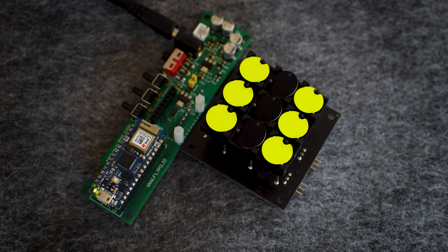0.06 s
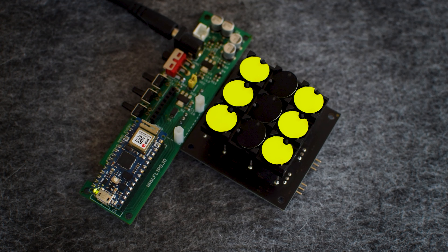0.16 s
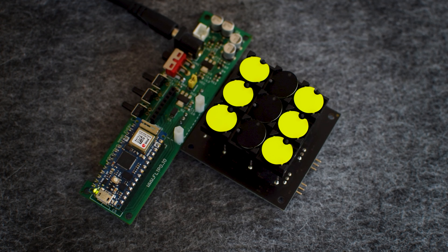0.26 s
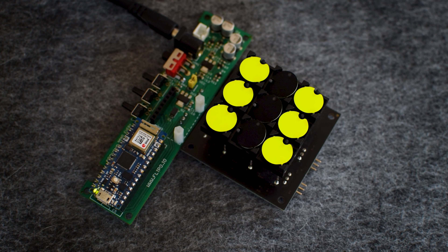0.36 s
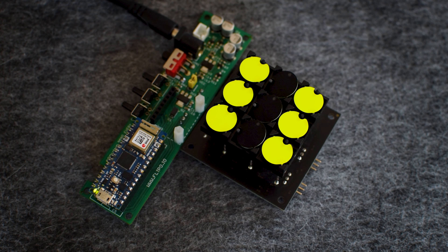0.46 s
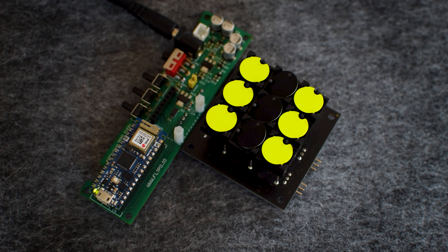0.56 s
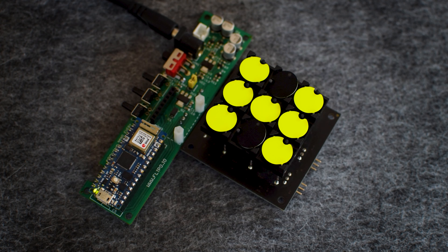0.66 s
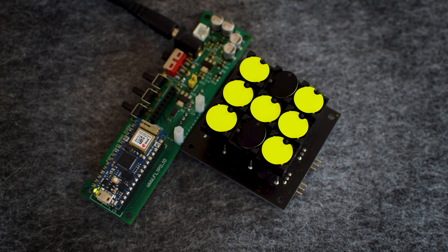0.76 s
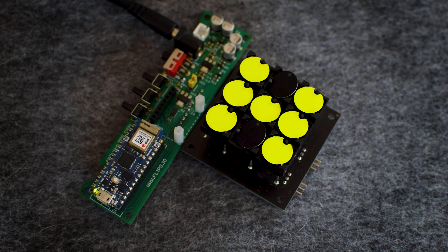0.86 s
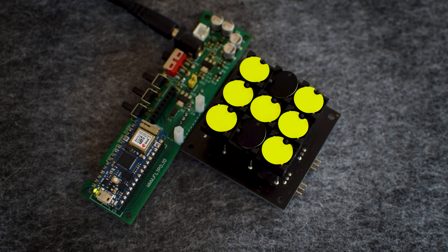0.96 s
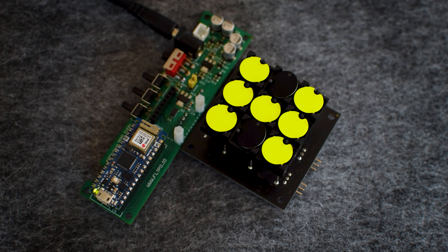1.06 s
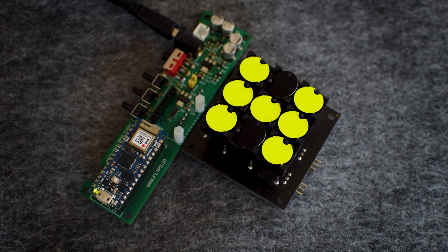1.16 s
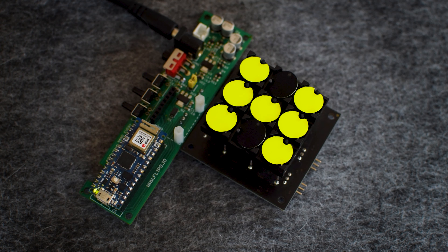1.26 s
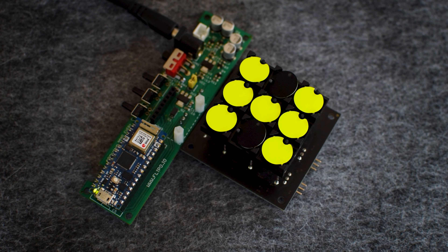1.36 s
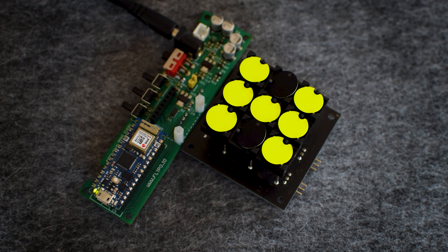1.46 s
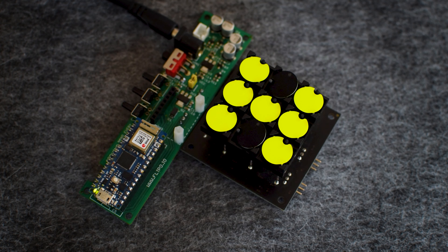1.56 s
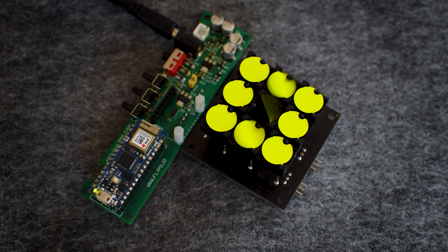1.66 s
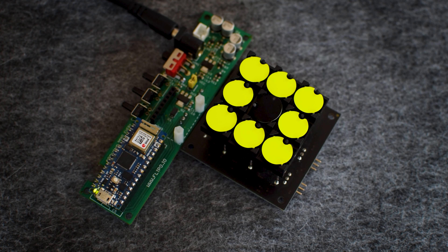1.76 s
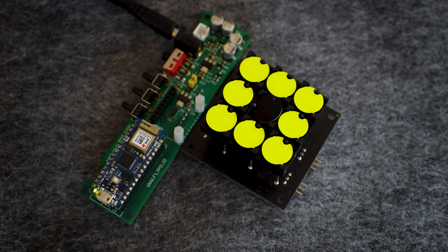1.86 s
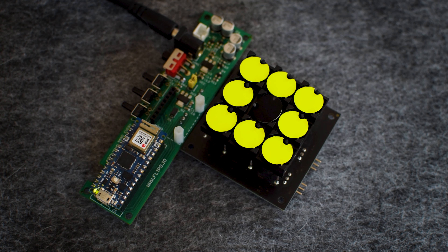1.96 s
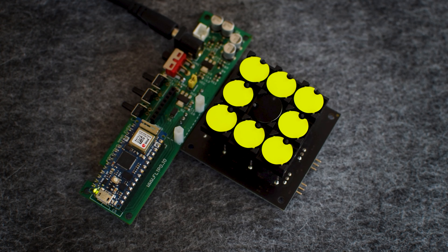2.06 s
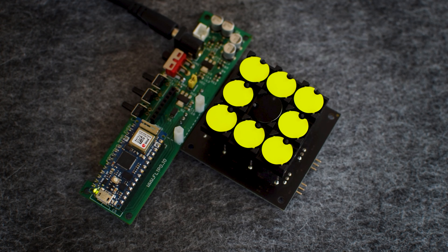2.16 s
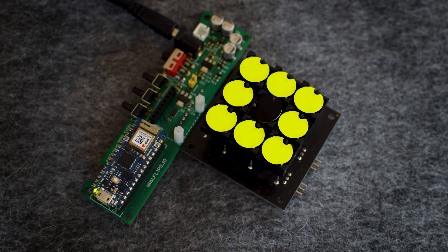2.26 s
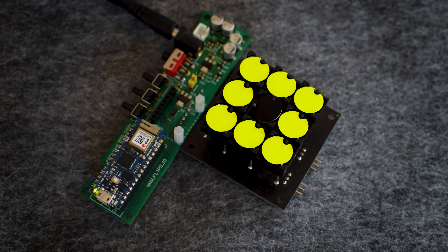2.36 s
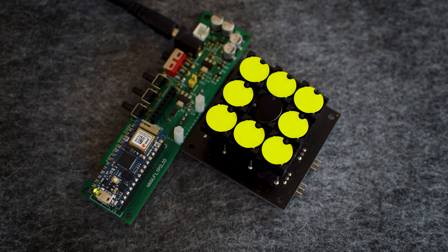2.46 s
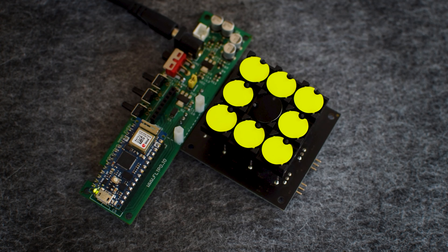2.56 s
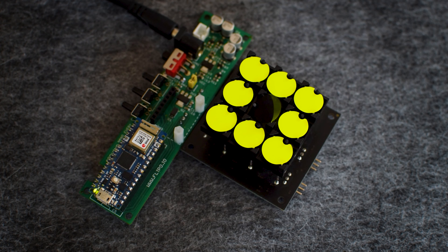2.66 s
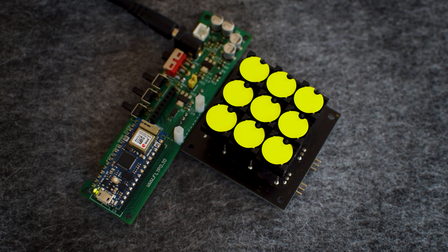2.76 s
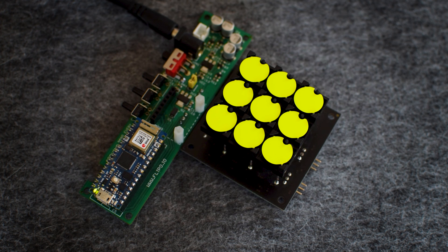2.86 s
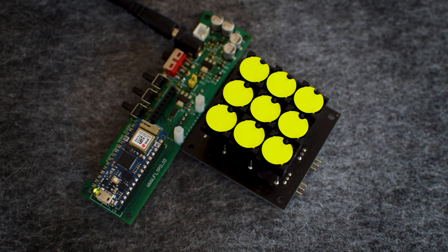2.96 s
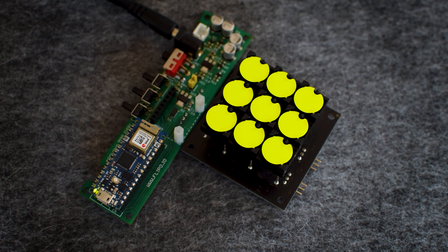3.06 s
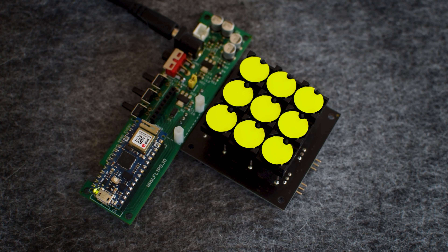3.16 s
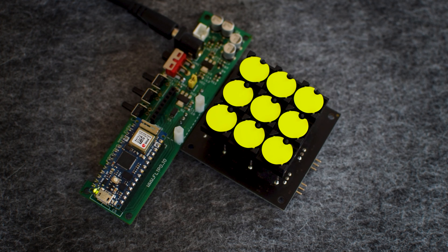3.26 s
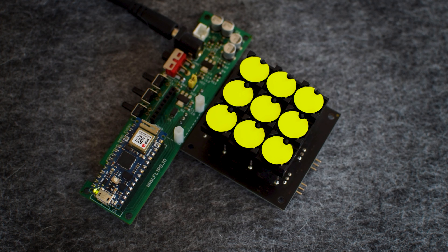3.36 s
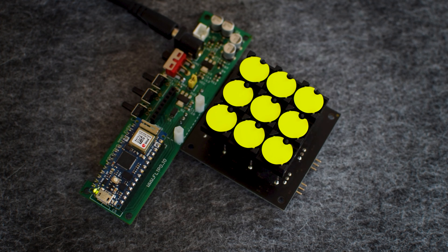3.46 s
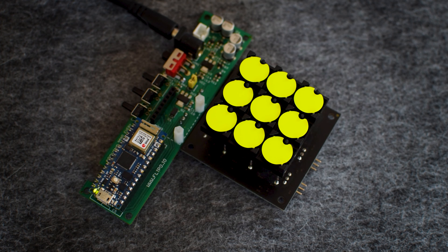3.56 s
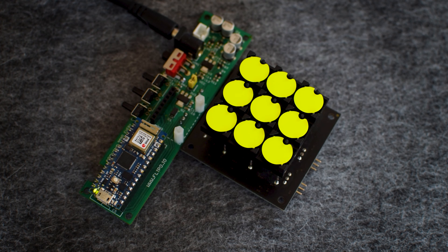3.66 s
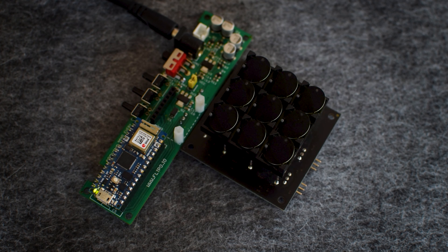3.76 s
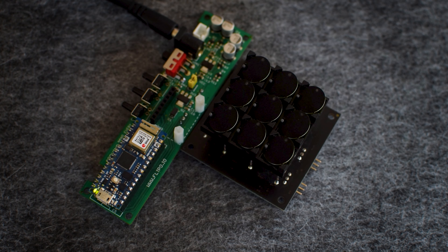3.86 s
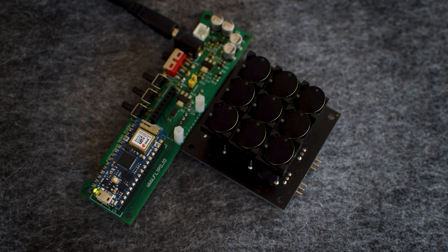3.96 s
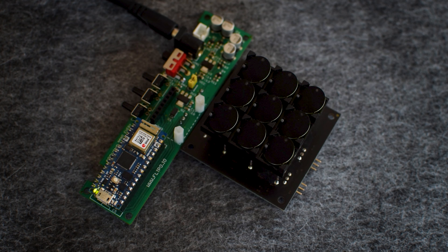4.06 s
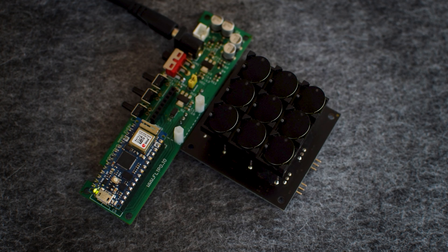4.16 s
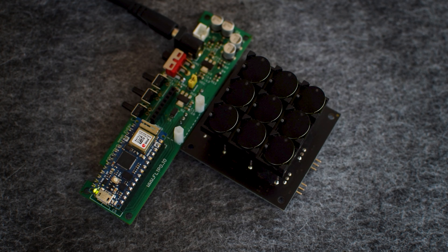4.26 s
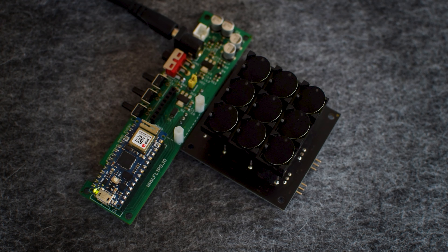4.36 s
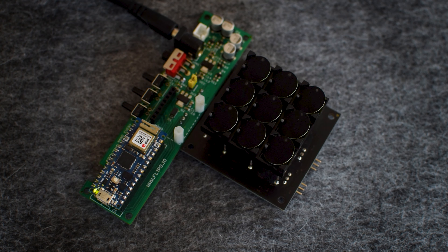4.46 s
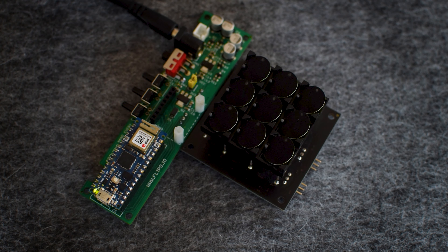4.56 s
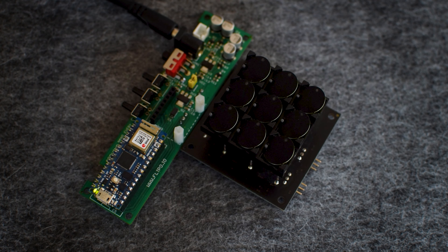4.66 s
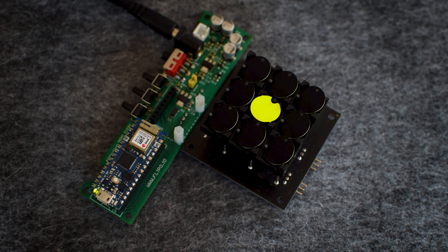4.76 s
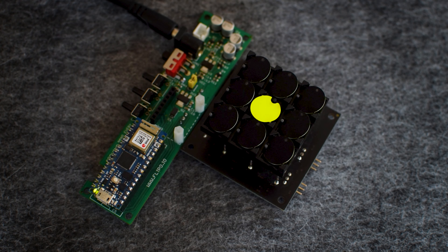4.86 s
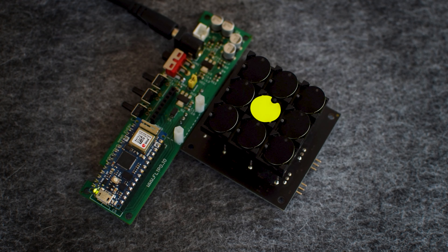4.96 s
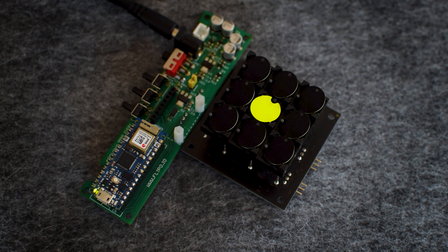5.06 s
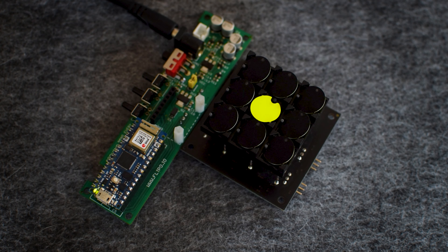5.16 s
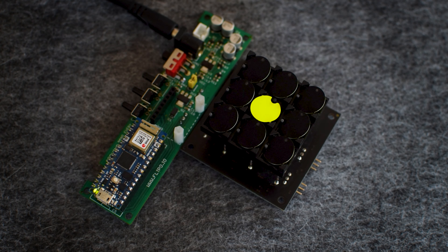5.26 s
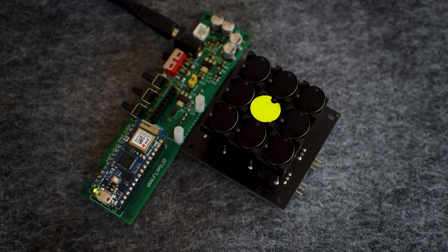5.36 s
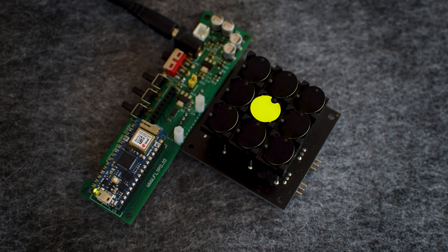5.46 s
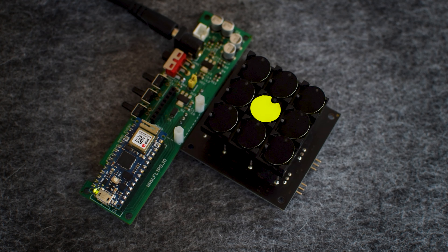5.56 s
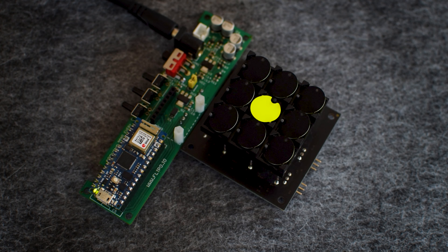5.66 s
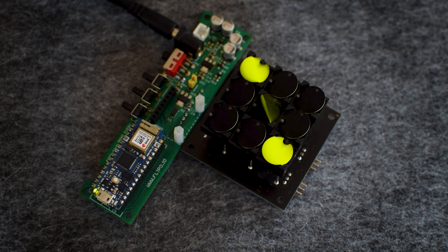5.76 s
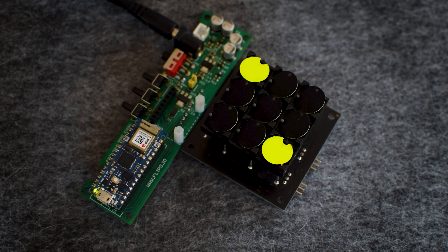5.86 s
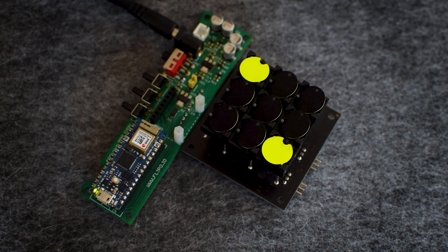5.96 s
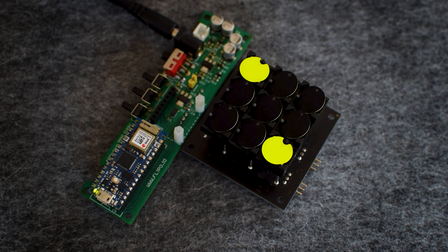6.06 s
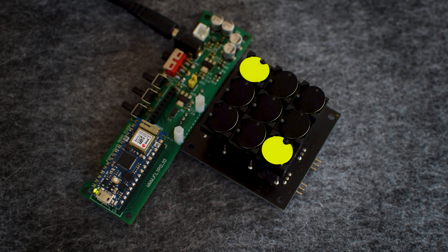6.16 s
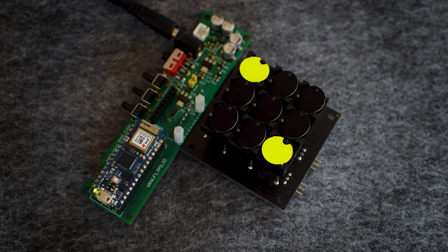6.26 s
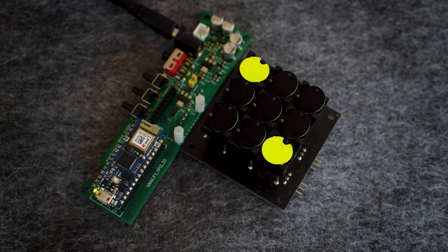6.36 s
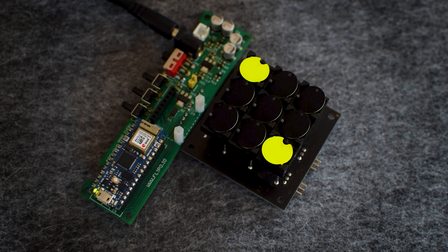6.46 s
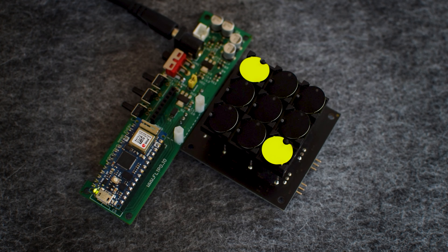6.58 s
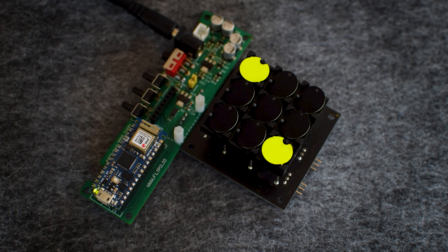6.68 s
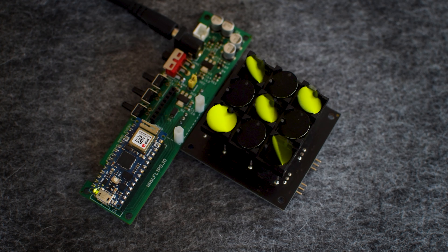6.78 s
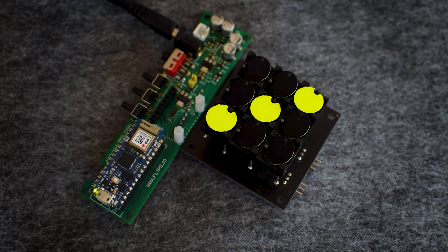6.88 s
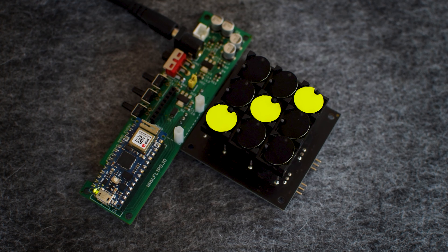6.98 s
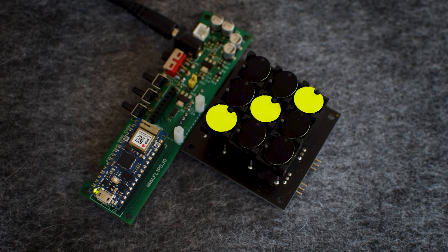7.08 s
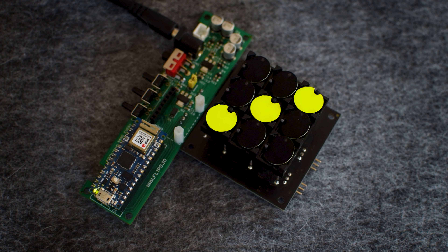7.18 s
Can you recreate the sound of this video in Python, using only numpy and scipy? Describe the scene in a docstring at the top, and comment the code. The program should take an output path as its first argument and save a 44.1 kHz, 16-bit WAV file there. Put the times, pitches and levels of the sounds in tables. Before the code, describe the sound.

A small flip-disc display clicks seven times in a quiet room, close to the microphone and slightly to the left. Each change begins with a tiny ringing rattle as the discs are kicked loose, followed a split second later by a sharp, bright snap and a slight bounce, dying away quickly. A single disc clicks at about 0.7 seconds, a few clack together at 1.7, and one clicks at 2.7. The fullest clatter comes at 3.7 seconds, when all the discs land almost at once. Another single click follows at 4.8, then thicker clacks at 5.8 and 6.8 seconds. The fuller changes make the circuit board ring briefly and pass a very faint thud into the table. The room adds only a slight, short reverberation, and a very faint low rumble and hiss continue between the clicks.

```python
"""A quiet room, where a three-by-three flip-disc display changes its pattern about once a second.
A coil pulse kicks each disc loose with a ringing rattle; some 50 ms later the disc snaps against
its stop and bounces. These impacts excite damped vibrations in the frame, the circuit board and
the table beneath. A close stereo microphone also hears faint reverberation, rumble, hiss and hum."""
import sys
import numpy as np
from scipy import signal
from scipy.fft import rfft, irfft, next_fast_len
from scipy.io import wavfile
from scipy.ndimage import map_coordinates

SR = 44100
rng = np.random.default_rng(int(sys.argv[2]) if len(sys.argv) > 2 else 0)


def transcribe(signal):
    """Save signal, clipped to [-1, 1], as a 16-bit WAV file at the path in sys.argv[1]."""
    frames = np.atleast_2d(signal).T
    limited = np.clip(frames, -1, 1)
    pcm = np.round(limited * 32767).astype(np.int16)
    wavfile.write(sys.argv[1], SR, pcm)


N = 318402
AGE = np.arange(SR // 4) / SR  # time since a contact, s
KICK_STEP_S, LAND_STEP_S, SCATTER_S = .0013, .0015, .0004  # disc-to-disc spacing and its spread

# Pattern changes, with relative levels per disc: start_s, disc_count, chatter_db, ring_db,
# flight_s, last_disc_lag_s, rebound_s, snap_db, board_db
FLIPS = [(0.6313, 1, -12, -12.5, 0.054, 0, 0.021, -1.5, -4.5),
         (1.6534, 3, -2, -2, 0.054, 0.002, .0213, -1.5, 1.5),
         (2.6779, 1, -2.5, -4, 0.055, 0, 0.023, -1.5, -7.5),
         (3.6995, 9, 1, -6, 0.056, 0.00081, 0.022, -2, 3.5),
         (4.7317, 1, -5.5, 0.5, .0507, 0, .0229, -1.5, -4),
         (5.7533, 3, -3, -6, 0.052, 0.0063, 0.023, -1.5, .5),
         (6.7790, 5, -3, -3.5, 0.052, 0.003, 0.017, -2, 2)]
def arrivals():
    """Time of flight sets when each disc meets its stop: rows of time_s, rebound_s, snap_db, board_db."""
    blows = []
    for start, discs, _, _, flight, lag, rebound, snap_db, board_db in FLIPS:
        times = in_turn(start + flight, discs, LAND_STEP_S)
        times[-1] += lag
        blows += [(s, rebound, snap_db, board_db) for s in times]
    return blows


def contacts(blows):
    """Inelastic collision: each disc strikes, springs off and falls back once with less energy."""
    for s, rebound, snap_db, board_db in blows:
        yield s, snap_db, board_db
        yield s + rebound, snap_db - 16.5, board_db - 11.5


# Spectrum of a disc striking its stop: frequency_hz, level_db
SNAP_SPECTRUM = [(200, -40.5), (900, -34), (2200, -27), (3100, -7), (3900, -12.5), (4500, -8.5),
                 (6300, 0.5), (9400, 0), (11100, -2.5), (12000, -10.5), (15500, -13.5), (17000, -23)]
# Spectrum of the ringing frame: frequency_hz, level_db
FRAME_SPECTRUM = [(100, -25), (700, -29.5), (1400, -12), (2000, -25), (3300, 1), (4600, -5), (6000, 0.5),
                  (8200, 2.5), (10500, -6), (13000, -5), (15500, -9.5), (16500, -22.5)]
# Modes of the circuit board: pitch_hz, level_db, t60_s
BOARD_MODES = [(251, -19, 0.09), (795, -22, .13), (1400, -.5, .05), (1493, .5, .055), (1675, -4, .045),
               (1870, -6, 0.028), (2036, -3.5, 0.03), (1110, -11, .055), (1180, -9, .06), (3220, 2, .035),
               (3450, 4, .032), (5856, 2, .035), (2330, -4, 0.054), (2600, -4, 0.029), (2920, -1.5, .04),
               (3620, 2.5, .045), (3930, -1, 0.045), (5100, -3, .04), (7960, 5, 0.042), (8320, 5.5, .025),
               (11260, 2, 0.026)]
def landings(blows):
    """Impact excitation: a broadband snap sets disc, frame and board into free, damped vibration."""
    out, snap = np.zeros((2, N)), impulse(SNAP_SPECTRUM)
    for s, db, board_db in contacts(blows):
        add(out, s, amp(db - 3.5) * snap)
        add(out, s + .0032, amp(db - 19) * snap)  # reflection from a nearby surface
        shiver = amp(-15.5) * body_noise(SNAP_SPECTRUM) * fade(.0081)
        frame = amp(-26.5) * body_noise(FRAME_SPECTRUM) * fade(.044)
        add(out, s, amp(db) * (shiver + frame) * rise(.00033))
        board = amp(-44) * ring(BOARD_MODES, detune=.007, scatter_db=1.5) * rise(.0008)
        add(out, s, amp(board_db) * (board + amp(-32.5) * flex(t60=.042)))
    return out


# Spectrum of the chattering pivots: frequency_hz, level_db
RATTLE_SPECTRUM = [(200, -25), (800, -33.5), (1500, -17), (2200, -25.5), (3000, -9), (3900, 2.5),
                   (4800, -5), (7500, 1), (9500, 2), (13500, -8.5), (15400, -3), (16400, -18)]
# Modes of a disc on its pivots: pitch_hz, level_db, t60_s
DISC_MODES = [(1446, -19, 0.065), (3560, -3, .024), (3940, 2, .022), (4260, -0.5, .02), (5400, -11, 0.024),
              (5820, -8, 0.039), (7250, -3, .045), (7590, -8, .035), (7880, -6, .04), (8170, -7, .03),
              (9120, -1.5, 0.013), (9380, 2, 0.012), (9630, -2.5, 0.014), (11070, -7.5, 0.018),
              (11100, -5.5, 0.022), (13200, -10, .016), (14600, -4, .014), (15400, 3.5, .016)]
def kicks():
    """Impulsive forcing: the coil jerks each disc, which chatters, rings and shakes the board."""
    out = np.zeros((2, N))
    for start, discs, chatter_db, ring_db, *_ in FLIPS:
        for s in in_turn(start, discs, KICK_STEP_S):
            chatter = amp(chatter_db - 21.5) * body_noise(RATTLE_SPECTRUM) * fade(.021)
            tone = amp(ring_db - 27.5) * ring(DISC_MODES, detune=.0042, scatter_db=4)
            board = amp(chatter_db - 46) * flex(t60=.14)
            add(out, s, rise(.0007) * (chatter + tone + board))
    return out


# Spectrum of the bending board: frequency_hz, level_db
FLEX_SPECTRUM = [(150, -15), (700, -23), (980, -19.5), (1180, -6.5), (1500, 0.5), (2000, -5.5), (3400, 1),
                 (4200, 0.5), (8000, -5.5), (15000, -13.5)]
def flex(t60):
    """Modal overlap: the struck board's dense bending modes merge into decaying noise."""
    return body_noise(FLEX_SPECTRUM) * fade(t60) * rise(.006)


def bearing_scrapes(blows):
    """Sliding friction: the fast-turning disc scrapes in its bearings just before it lands."""
    out, lead_s = np.zeros((2, N)), .004
    swell = AGE / lead_s * (AGE < lead_s)
    for s, _, db, _ in blows:
        add(out, s - lead_s, amp(db - 36.5) * swell * body_noise(FRAME_SPECTRUM))
    return out


def pivot_rubs():
    """Mechanical coupling: jostled by the first disc, the others rub and ring softly in mid-turn."""
    out, delay_s, scatter_s = np.zeros((2, N)), .02, .003
    for start, discs, *_ in FLIPS:
        for s in in_turn(start + delay_s, discs, KICK_STEP_S)[1:]:
            rub = body_noise(FRAME_SPECTRUM) * fade(.021)
            tone = amp(-7.5) * ring(DISC_MODES, detune=.004, scatter_db=.5)
            brush = (rub + tone) * rise(.00087) + amp(1) * flex(t60=.044)
            add(out, s + scatter_s * rng.standard_normal(), amp(-47.5) * brush)
    return out


def table_thuds():
    """Structure-borne sound: when several discs land, the board's feet pass a thud into the table."""
    out = np.zeros((2, N))
    spectrum = [(30, -2), (80, 2), (170, -10), (250, -2), (600, -14), (1500, -42.5)]
    for start, discs, _, _, flight, *_ in FLIPS:
        if discs >= 3:
            thud = noise(spectrum, correlation=[(100, .21)], size=len(AGE))
            add(out, start + flight + .0029, amp(-49) * thud * fade(.22) * rise(.0089))
    return out


# Left-right likeness of the display's noise: frequency_hz, correlation
BODY_CORRELATION = [(300, 0.4), (1300, 1), (3000, 1), (4500, .85), (7000, 0.98), (10000, 0.79), (15000, 1)]
def body_noise(spectrum):
    """Coherence: the display's vibration reaches both channels much alike, except in the bass."""
    return noise(spectrum, BODY_CORRELATION, size=len(AGE))


# Channel balance of the direct sound: frequency_hz, left_minus_right_db
BALANCE = [(1300, 1.3), (2400, -0.1), (4400, 0.1), (7500, 5), (10000, 0), (15000, 0.4)]
def direct_sound(x):
    """Level and arrival-time differences place the display slightly to the left."""
    sides, lead_s = np.array([[1], [-1]]), 14e-6
    gain = lambda hz: amp(sides * along(BALANCE, hz) / 2)
    return filtered(x, lambda hz: gain(hz) * np.exp(1j * np.pi * sides * hz * lead_s))


# Spectrum of the reverberation: frequency_hz, level_db
TAIL_SPECTRUM = [(150, -1), (700, -2), (2000, -2), (4500, -4), (6200, -4), (8500, -1), (10500, -4),
                 (13000, 0), (15500, 0)]
# Reverberation time: frequency_hz, t60_s
TAIL_DECAY = [(200, .33), (800, .27), (2000, .24), (5000, .25), (8000, .25), (15000, .21)]
def reverberation(x):
    """Diffuse reflections build up and decay, with a new random tail per channel and half second."""
    out, block = np.zeros((2, N)), SR // 2
    for start in range(0, N, block):
        hz, t, bands = signal.stft(rng.standard_normal((2, block)), SR, nperseg=256)
        bands = bands * amp(along(TAIL_SPECTRUM, hz))[:, None] * fade(along(TAIL_DECAY, hz)[:, None], t)
        tail = signal.istft(bands, SR, nperseg=256)[1]
        tail *= rise(.014, np.arange(tail.shape[1]) / SR)
        tail /= np.linalg.norm(tail[0])
        add(out, start / SR, signal.fftconvolve(x[:, start:start + block], tail, axes=1))
    return out


# Spectrum of the room's background noise: frequency_hz, level_db
AIR_SPECTRUM = [(12, -33), (20, 2), (52, -2.5), (107, -14), (137, -7.5), (162, -16.5), (197, -12.5),
                (397, -17), (586, -24.5), (1250, -29), (1390, -31), (15800, -38.5)]
# Left-right likeness of that noise: frequency_hz, correlation
AIR_CORRELATION = [(30, .25), (150, 0.18), (300, -0.037), (1000, .3), (3000, -0.008), (12000, 0.11)]
def air():
    """Ambient noise: a low rumble, slowly modulated in amplitude, lies under steady hiss."""
    drift = map_coordinates(rng.standard_normal(64), [np.arange(N) / SR * 4], mode="mirror")
    steady = noise(AIR_SPECTRUM, AIR_CORRELATION, size=N)
    rumble = lowpass(steady, 500)
    hiss = steady - rumble
    return amp(-63) * (hiss + rumble * amp(.8 * drift) * amp([[1.8], [-1.8]]))


# Faint background tones: start_s, end_s, first_pitch_hz, last_pitch_hz, level_db
WHISTLES = [(0, .32, 1760, 1740, -82), (.27, .47, 1300, 1275, -76), (.75, 1.15, 1130, 1105, -82),
            (3.2, 3.72, 385, 360, -72), (6.9, 7.22, 420, 415, -74)]
def hum_and_whistles():
    """Pure tones: steady mains hum, and brief whistles that waver by random frequency modulation."""
    hum = amp(-73.5) * np.sin(2 * np.pi * 50 * np.arange(N) / SR)
    out = np.tile(hum, (2, 1))
    for start, end, first_hz, last_hz, db in WHISTLES:
        size = round((end - start) * SR)
        waver_hz = 14 * unit(lowpass(rng.standard_normal(size), 40))
        pitch_hz = np.linspace(first_hz, last_hz, size) + waver_hz
        swell = np.sqrt(np.hanning(size))
        add(out, start, amp(db) * swell * np.sin(2 * np.pi * np.cumsum(pitch_hz) / SR))
    return out


def in_turn(s, discs, step):
    """Timing jitter: the first disc acts at s, the others a slightly uneven step apart."""
    order = np.arange(discs)
    return s + step * order + SCATTER_S * rng.standard_normal(discs) * (order > 0)


def ring(modes, detune, scatter_db):
    """Modal superposition: damped sinusoids whose pitch and strength vary from blow to blow."""
    hz, db, t60 = np.transpose(modes)[:, :, None]
    pitch, strength, phase = rng.standard_normal((3, len(modes), 1))
    waves = np.sin(2 * np.pi * (hz * (1 + detune * pitch) * AGE + phase))
    return np.sum(amp(db + scatter_db * strength) * fade(t60) * waves, axis=0)


def impulse(spectrum, size=2048):
    """Minimum phase gives the sharpest causal pulse with this spectrum, peak 1."""
    cepstrum = irfft(np.log(amp(along(spectrum, np.fft.rfftfreq(size, 1 / SR)))))
    cepstrum[1:size // 2] *= 2
    cepstrum[size // 2 + 1:] = 0
    pulse = irfft(np.exp(rfft(cepstrum)))
    return pulse / np.abs(pulse).max()


def noise(spectrum, correlation, size):
    """Coloured stereo noise of rms 1; the ratio of mid to side sets its correlation."""
    def response(hz):
        angle = np.arccos(np.clip(along(correlation, hz), -1, 1)) / 2
        return amp(along(spectrum, hz)) * [np.cos(angle), np.sin(angle)]
    mid, side = filtered(rng.standard_normal((2, size)), response)
    return unit(np.array([mid + side, mid - side]))


def filtered(x, response):
    """Linear filtering: the spectrum of x times a frequency response."""
    n = x.shape[-1]
    padded = next_fast_len(n + 8192)
    return irfft(rfft(x, padded) * response(np.fft.rfftfreq(padded, 1 / SR)), padded)[..., :n]


def lowpass(x, corner_hz):
    """Second-order roll-off with zero phase."""
    return filtered(x, lambda hz: 1 / (1 + (hz / corner_hz) ** 2))


def along(points, hz):
    """Interpolation of (frequency_hz, value) points on a log axis."""
    frequencies, values = np.transpose(points)
    return np.interp(np.log(hz + 1), np.log(frequencies + 1), values)


def rise(tau_s, t=AGE):
    """Exponential approach to full amplitude."""
    return 1 - np.exp(-t / tau_s)


def fade(t60, t=AGE):
    """Exponential decay, 60 dB in t60 seconds."""
    return np.exp(-np.log(1000) * t / t60)


def amp(db):
    """Decibels to gain."""
    return 10 ** (np.asarray(db) / 20)


def unit(x):
    """Normalisation to rms 1."""
    return x / np.sqrt(np.mean(x ** 2) + 1e-20)


def add(track, s, sound):
    """Superpose a sound on a stereo track at time s."""
    part = track[:, round(s * SR):][:, :sound.shape[-1]]
    part += sound[..., :part.shape[1]]


def scene():
    """Superposition of the display's direct and reverberant fields and the background."""
    blows = arrivals()
    display = kicks() + pivot_rubs() + bearing_scrapes(blows) + landings(blows) + table_thuds()
    return direct_sound(display) + amp(-23.5) * reverberation(display) + air() + hum_and_whistles()


def record(dry):
    """Soft saturation rounds the sharpest peaks; a steep low-pass limits the bandwidth."""
    ceiling, top_hz = .72, 16300
    rounded = dry / (1 + np.abs(dry / ceiling) ** 6) ** (1 / 6)
    return filtered(rounded, lambda hz: 1 / np.sqrt(1 + (hz / top_hz) ** 160))


dry = scene()
out = record(dry)
transcribe(out)
```